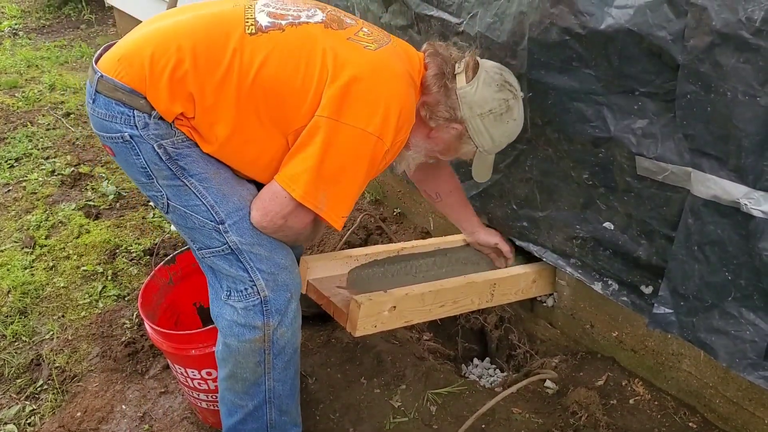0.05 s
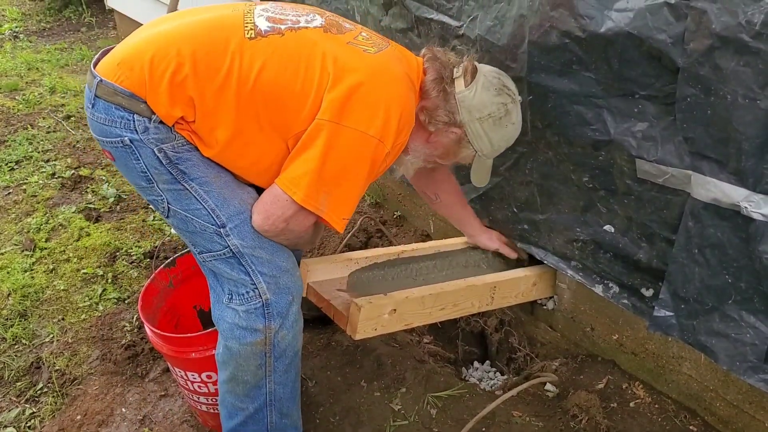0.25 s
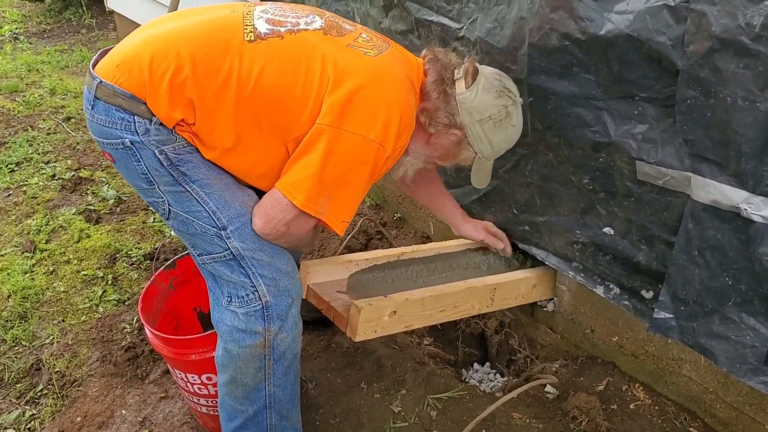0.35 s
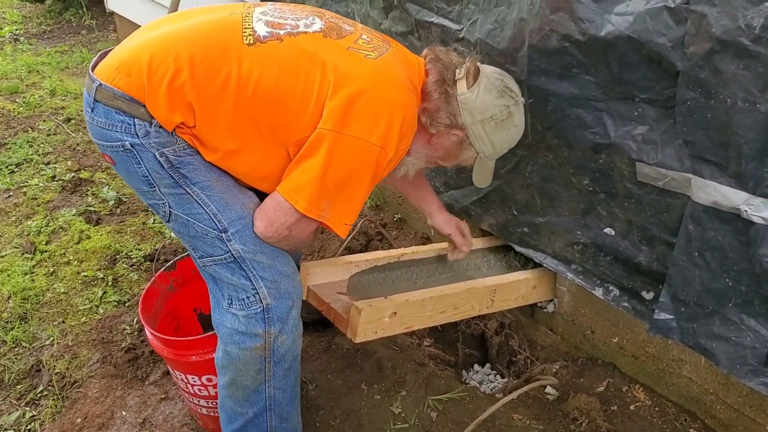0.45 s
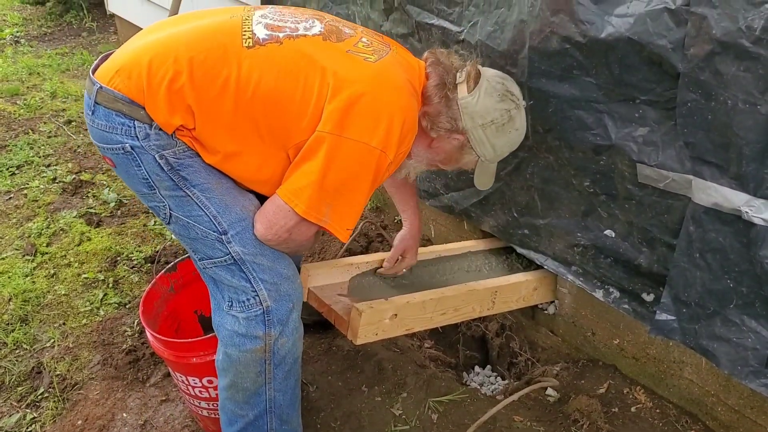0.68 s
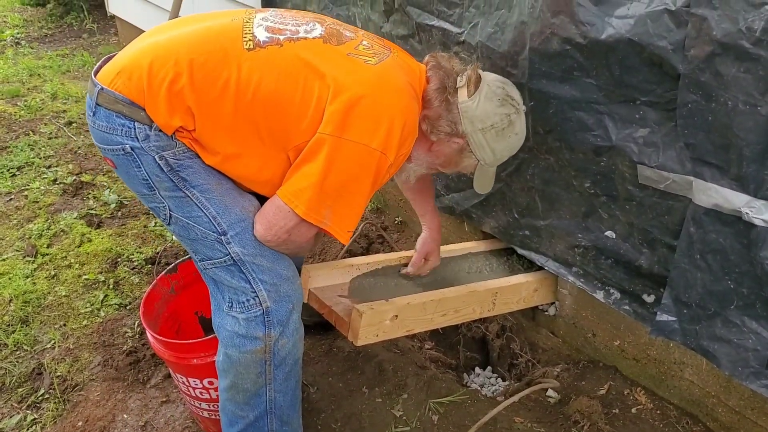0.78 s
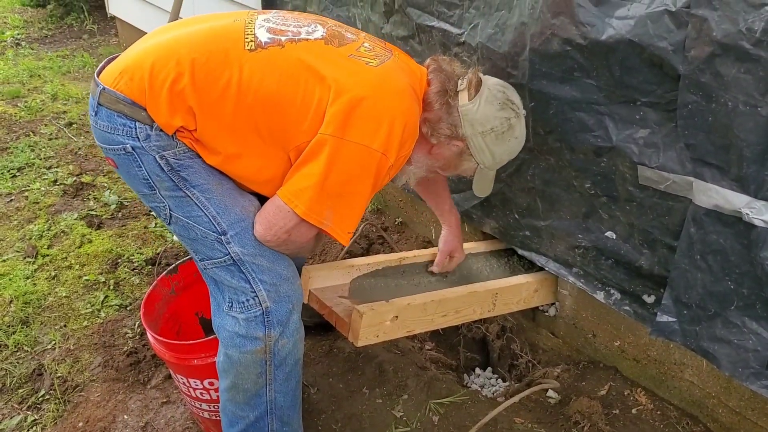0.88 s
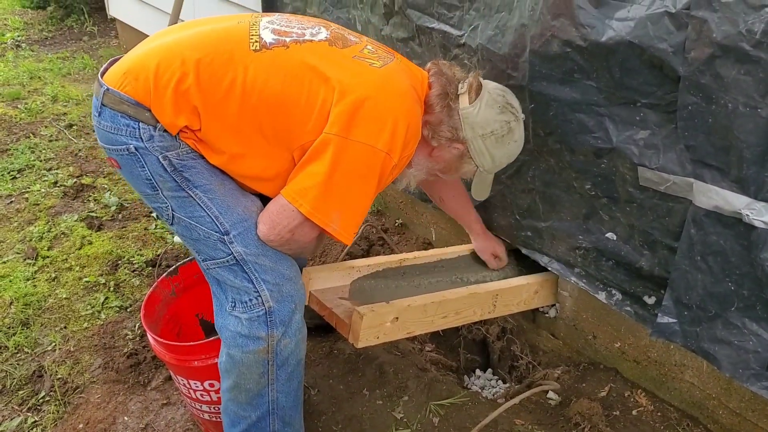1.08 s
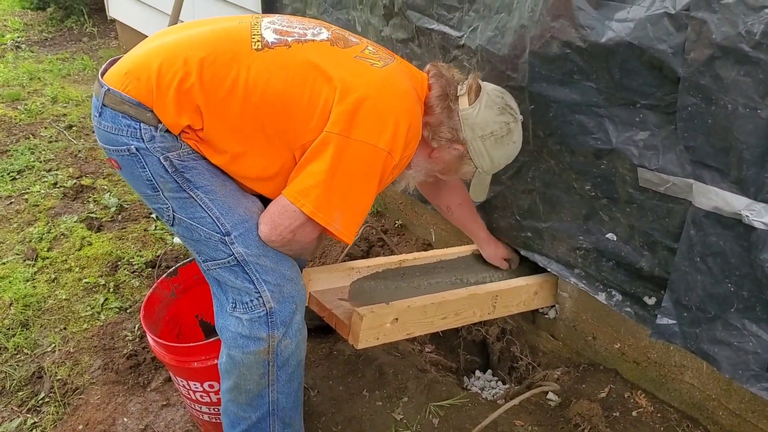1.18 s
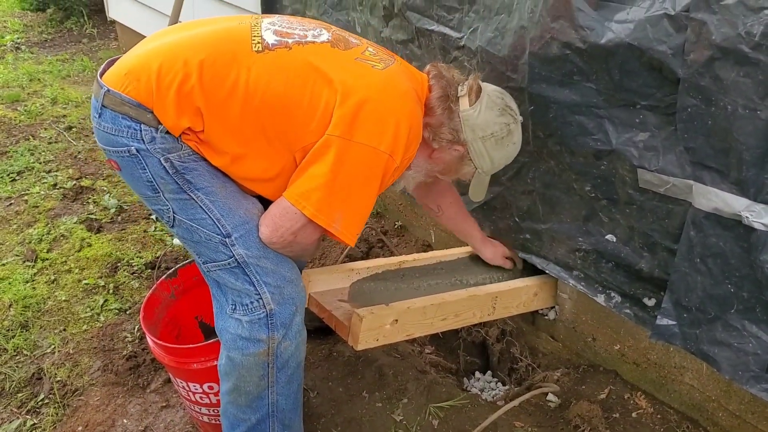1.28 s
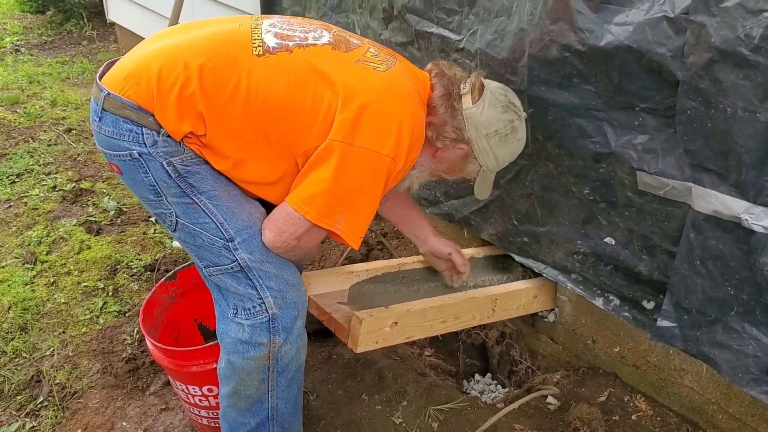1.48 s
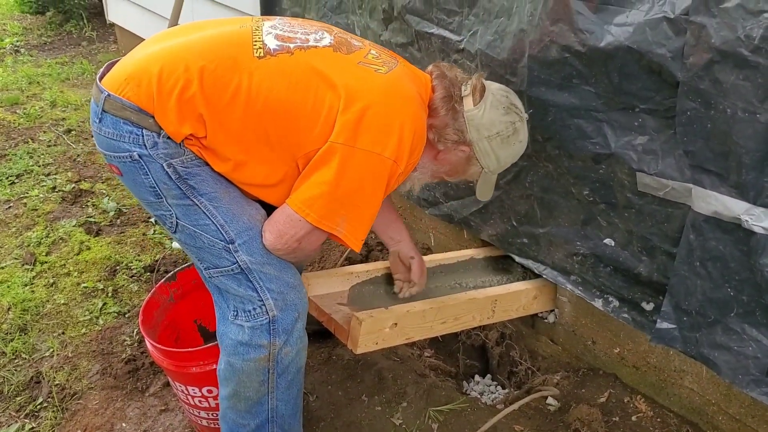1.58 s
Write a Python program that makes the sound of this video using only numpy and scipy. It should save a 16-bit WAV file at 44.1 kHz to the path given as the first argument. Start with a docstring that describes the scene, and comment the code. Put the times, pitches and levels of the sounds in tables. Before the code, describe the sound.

Outdoors, wet sandy mortar scrapes under a hand: two short strokes, then a longer one. A gust thumps the microphone near the start, and a knock on the wooden frame follows the rubbing, with faint distant bird chirps.

```python
"""A hand rubs gritty wet mortar in a wooden frame outdoors: three strokes of sand catching and slipping,
with coarse grains snapping and the wood ringing under the forward strokes. Early on, a gust buffets
the microphone, left port first; near the end a knock sets the frame ringing.
Behind it all sit a low outdoor rumble, a swelling hum and the faint broken chirps of a distant bird."""
import sys
import numpy as np
from scipy import signal
from scipy.fft import rfft, irfft
from scipy.io import wavfile

SR = 44100
rng = np.random.default_rng(int(sys.argv[2]) if len(sys.argv) > 2 else 0)


def store_wav(level_fs):
    """Save 16-bit WAV to argv[1]."""
    pcm = np.round(np.clip(np.atleast_2d(level_fs), -1, 1) * 32767)
    wavfile.write(sys.argv[1], SR, pcm.T.astype(np.int16))


N = 72765
T = np.arange(N) / SR
BIN_HZ = np.fft.rfftfreq(N, 1 / SR)


def amp(db):
    """Decibels to gain."""
    return 10 ** (np.asarray(db) / 20)


def pan(left_db):
    """Gains that lift the left port and lower the right by as much."""
    return amp([[left_db], [-left_db]])


def unit_rms(x):
    """Scales to rms 1."""
    return x / np.sqrt(np.mean(x ** 2, axis=-1, keepdims=True) + 1e-20)


def level(points):
    """An envelope in dB: silent outside its points, but held where it nears an end of the scene."""
    times, db = np.transpose(points)
    before = db[0] if times[0] < .04 else -120
    after = db[-1] if times[-1] > 1.6 else -120
    return np.interp(T, times, db, left=before, right=after)


def drift(rate_hz):
    """Slow random wander, rms 1."""
    return unit_rms(irfft(rfft(rng.standard_normal(N)) * np.exp(-(BIN_HZ / rate_hz) ** 2), N))


def decay(start, t60, rise_s=0.00028):
    """Quick attack and exponential decay."""
    t = np.maximum(T - start, 0)
    return (1 - np.exp(-t / rise_s)) * np.exp(-np.log(1000) * t / t60)


def coloured(x, colour):
    """Equalises x, at rms 1, with a steep low cut under the first point."""
    hz = BIN_HZ + 1
    points_hz, db = np.transpose(colour)
    gain = amp(np.interp(np.log(hz), np.log(points_hz), db))
    low_cut = np.minimum(hz / points_hz[0], 1) ** 2
    return unit_rms(irfft(rfft(x) * gain * low_cut, N))


def ports(x):
    """Spreads x over the two microphone ports: alike in the bass, wide in the treble."""
    # what both ports hear in common (frequency [Hz], power share [0-1])
    likeness = [(100, 0.73), (350, 0.86), (700, 0.8), (1300, 0.61), (2400, 0.46), (4000, 0.089)]
    share = np.interp(BIN_HZ, *np.transpose(likeness))
    scrambled = x * rng.choice([-1, 1], (2, N))
    return irfft(np.sqrt(share) * rfft(x) + np.sqrt(1 - share) * rfft(scrambled), N)


def hiss(colour):
    """Coloured stereo noise."""
    return coloured(ports(rng.standard_normal(N)), colour)


def bursts(hits, colour, t60, rise_s=0.00028):
    """A dying burst of noise at each hit."""
    return sum(amp(db) * decay(start, t60, rise_s) for start, db in hits) * hiss(colour)


def outdoor_air():
    """A bed of low rumble and thin hiss that starts louder and settles."""
    # tone of the bed (frequency [Hz], gain [dB])
    colour = [(20, -24), (55, 8), (110, -2.5), (290, -13), (450, -15.5), (1000, -20.5), (3000, -21.5),
              (7000, -26.5), (12000, -26.5), (15500, -33.5)]
    # its fader ride (time [s], gain [dB])
    fade = [(0, 12), (.6, 0.5), (1.65, 0.5)]
    return amp(-57.5 + level(fade)) * hiss(colour)


def hum(pitch_hz=280.3, width_hz=47.4):
    """A narrow band of noise, heard as a low hum."""
    # two swells (time [s], level [dB])
    swells = [(0, -59), (.13, -50), (.48, -59), (.78, -58), (1.13, -52.5), (1.3, -55), (1.5, -61)]
    phase = 2 * np.pi * pitch_hz * T
    band = (drift(width_hz) * np.cos(phase) + drift(width_hz) * np.sin(phase)) / np.sqrt(2)
    return amp(level(swells)) * band


def bird(pitch_hz=2510, half_length_s=0.016, rasp_rad=0.92):
    """A distant bird: short, hoarse notes that slide up or down."""
    # notes (centre time [s], level [dB], glide [Hz/s])
    chirps = [(1.277, -64, 9000), (1.301, -62.5, -7000), (1.348, -59, -2000), (1.452, -58.5, -9000),
              (1.498, -60, 1510), (1.569, -57, 8000), (1.604, -55.5, -11000), (1.647, -55.5, 5997)]
    song = 0
    for centre, db, glide in chirps:
        t = T - centre
        phase = 2 * np.pi * (pitch_hz * t + glide * t ** 2 / 2) + rasp_rad * drift(rate_hz=190)
        song += amp(db) * np.exp(-(t / half_length_s) ** 2) * np.sin(phase)
    return song


def buffet(pressure, hard_from_db=-25, hard_range_db=9, steady_s=0.012):
    """Turbulence rumbles at one port; the harder it blows, the brighter it gets."""
    # tone of light and of hard wind (frequency [Hz], gain [dB])
    soft_wind = [(20, -29), (50, 0.5), (90, 1), (170, -17), (600, -49), (1500, -75)]
    hard_wind = [(20, -31), (60, 12), (200, 3), (340, -1.5), (440, -8), (700, -22.5), (1000, -37.5),
                 (2500, -78)]
    db, eddies = level(pressure), rng.standard_normal(N)
    hardness = np.clip((db - hard_from_db) / hard_range_db, 0, 1)
    flow = (1 - hardness) * coloured(eddies, soft_wind) + hardness * coloured(eddies, hard_wind)
    # flatten the noise's own swells so that the pressure shapes the level
    window = np.hanning(int(2 * steady_s * SR))
    power = signal.fftconvolve(abs(signal.hilbert(flow)) ** 2 / 2, window / window.sum(), "same")
    return amp(db) * flow / np.sqrt(power + 1e-9)


def thump(start, length, db, top_hz, fall_octaves=2):
    """One eddy hits the port: it swells quickly, then drops in pitch and dies."""
    progress = np.clip((T - start) / length, 0, 1)
    hz = top_hz * 2 ** (-fall_octaves * progress ** 2)
    phase = 2 * np.pi * np.cumsum(hz * (progress > 0)) / SR
    return amp(db) * np.sin(np.pi * np.sqrt(progress)) * np.sin(phase)


def gust(hoot_at_s=.549, hoot_half_s=0.018, hoot_hz=287):
    """Wind hits the left port, then the right; a soft rush and a short hoot follow."""
    # wind pressure at each port, and the rush in its wake (time [s], level [dB])
    wind_left = [(0, -39.5), (.015, -24.5), (.055, -65), (.19, -38.5), (.217, -16), (.26, -14.5),
                 (.3, -21.5), (.326, -37), (.35, -21.5), (.382, -27.5), (.398, -24), (.44, -37),
                 (.465, -22), (.51, -48), (.59, -54), (.636, -39), (.67, -90)]
    wind_right = [(0, -59), (.28, -51), (.35, -39), (.41, -34), (.445, -27), (.478, -23), (.51, -51.5),
                  (.56, -59)]
    wake = [(.44, -51), (.52, -49), (.59, -62.5), (.635, -56.5), (.68, -61.5)]
    # tone of the rush (frequency [Hz], gain [dB])
    wake_colour = [(220, -3), (320, -4.5), (460, -1), (620, -19), (1200, -43.5)]
    # single eddies (start [s], length [s], level [dB], starting pitch [Hz])
    thumps = [(.2162, 0.039, -10.5, 291.8), (0.2477, 0.022, -7.5, 300), (0.2828, 0.017, -13, 248),
              (0.354, 0.024, -12.5, 240), (0.384, 0.037, -21, 117), (0.459, 0.031, -13.5, 109)]
    left = buffet(wind_left) + sum(thump(*row) for row in thumps)
    right = buffet(wind_right)
    rush = amp(level(wake)) * hiss(wake_colour)
    hoot = np.exp(-((T - hoot_at_s) / hoot_half_s) ** 4) * np.sin(2 * np.pi * hoot_hz * T)
    return np.array([left, right]) + rush + amp(-40.5) * hoot


def knock(port_lag_s=.00008):
    """A blow with small rebounds: the frame's modes, a crack, crushed grit and a short yard echo."""
    # blows on the frame, and grit crushed under them (time [s], relative level [dB])
    blows = [(1.3694, -1), (1.3737, -2.5), (1.3872, -23), (1.4127, -21), (1.4374, -22.5)]
    grit = [(1.3703, -30.5), (1.417, -42)]
    # modes of the wood (frequency [Hz], gain [dB], t60 [s])
    modes = [(324, -11, 0.23), (385.3, -9.5, 0.19), (472, -9.5, 0.2), (640, 2, 0.1), (804.7, 6.5, 0.032),
             (890, 3.5, 0.052), (978, -7, 0.11), (1434, -2, 0.044), (1590, 3.5, 0.043), (1770, 7, 0.017),
             (2143, -20, 0.047), (2425, -8, 0.14), (3540, -13, 0.15)]
    # tone of each noise layer (frequency [Hz], gain [dB])
    crack_colour = [(200, -47), (600, 0.5), (900, 3.5), (1200, -3.5), (1700, 3.5), (2500, -3),
                    (3000, -15.5), (4800, -12), (7000, -29.5), (9000, -20), (15500, -13)]
    grit_colour = [(1400, -1), (2400, 12), (3800, -21), (15000, -21)]
    yard_colour = [(150, -42), (380, 6.5), (900, -3), (5000, -20), (15000, -22)]
    port_time = T - np.array([[0], [port_lag_s]])
    ring = 0
    for hz, mode_db, t60 in modes:
        swing = np.sqrt(sum((amp(db) * decay(start, t60)) ** 2 for start, db in blows))
        ring += amp(mode_db) * swing * np.sin(2 * np.pi * (hz * port_time + rng.random()))
    crack = bursts(blows, crack_colour, t60=0.077)
    tail = decay(blows[0][0], t60=0.24, rise_s=0.012) * hiss(yard_colour)
    crush = bursts(grit, grit_colour, t60=0.017)
    return (amp(-34) * ring + amp(-31.5) * crack + crush) * pan(1.4) + amp(-36) * tail


def scuffs():
    """Fingers scuff the frame just before the knock."""
    # touches (time [s], level [dB])
    touches = [(1.322, -48.5), (1.355, -48)]
    # their tone (frequency [Hz], gain [dB])
    colour = [(700, -4), (1300, -10), (1700, 9.5), (2200, -17), (3200, -24), (15000, -33)]
    return bursts(touches, colour, t60=0.1) * pan(1.2)


def snaps():
    """Single coarse grains snap under the hand."""
    # snapping grains (time [s], level [dB])
    cracks = [(0.0712, -38.5), (0.188, -33.5), (0.8251, -37.5), (0.8845, -33), (0.901, -36.5), (1.007, -43),
              (1.022, -35), (1.048, -42), (1.0864, -37), (1.136, -41), (1.16, -48), (1.186, -41.5),
              (1.4164, -38)]
    # their bright tone (frequency [Hz], gain [dB])
    colour = [(800, 10.5), (2300, 2.4), (4500, 7.6), (7200, 2), (11500, 20.8), (15500, 12.7)]
    return bursts(cracks, colour, t60=0.03, rise_s=0.00087) * pan(1.2)


def frame_ring(scrape, half_width_hz=15):
    """Adds the wood's ring to a scrape, wavering as the hand's grip shifts."""
    # narrow resonances of the frame (frequency [Hz], gain [dB])
    modes = [(1665, -1), (2220, -19), (3920, 4.5)]
    response = sum(amp(db) / (1 + 1j * (BIN_HZ - hz) / half_width_hz) for hz, db in modes)
    waver_db = drift(rate_hz=17)
    return scrape + irfft(rfft(scrape) * response, N) * amp(waver_db)


def clumped(scrape, band_hz=1600, flicker_db=1.8):
    """Grains come in clumps: each band of the scrape flickers on its own."""
    spectrum, bands = rfft(scrape), 0
    for centre in np.arange(0, SR / 2, band_hz):
        band = irfft(spectrum * np.maximum(1 - abs(BIN_HZ - centre) / band_hz, 0), N)
        bands += band * amp(flicker_db * drift(rate_hz=130))
    return unit_rms(bands)


def rub(pressure, colour, left_db, rough_db, grains_per_s=3500, grain_share=0.27):
    """Thousands of sand grains catch and slip, over a smooth hiss."""
    grains = unit_rms(rng.choice([-1, 1], N) * (rng.random(N) < grains_per_s / SR))
    friction = np.sqrt(grain_share) * grains + np.sqrt(1 - grain_share) * rng.standard_normal(N)
    scrape = clumped(coloured(ports(friction), colour))
    return scrape * amp(level(pressure) + rough_db * drift(rate_hz=43)) * pan(left_db)


def first_stroke():
    """A short forward push that rings the frame."""
    # hand pressure (time [s], level [dB])
    pressure = [(0, -46.5), (.06, -50.5), (.125, -49), (.2, -53), (.25, -62.5), (.3, -89)]
    # tone of the scrape (frequency [Hz], gain [dB])
    colour = [(290, -39), (500, -10), (657, -27), (769, -7), (1270, -11.5), (1620, -1), (1880, -7.5),
              (3960, -8.5), (7130, -19.5), (12100, -9), (15500, -13.5)]
    return frame_ring(rub(pressure, colour, left_db=1.9, rough_db=1.0))


def back_stroke():
    """The hand draws back, its treble split between left and right."""
    # hand pressure (time [s], level [dB])
    pressure = [(.2, -67), (.25, -49.5), (.295, -42.5), (.385, -44.5), (.436, -51), (.49, -58), (.56, -84)]
    # tone of the scrape (frequency [Hz], gain [dB])
    colour = [(700, -10.5), (1300, -8), (2000, 1), (3250, -5.5), (3670, 6), (4250, -5), (4830, 3),
              (5500, -6), (6100, -5.5), (7200, -24.5), (8500, -13.5), (10000, -37), (12000, -12),
              (15500, -19)]
    # stereo lean (frequency [Hz], left minus right [dB])
    balance = [(3700, -0.7), (4400, -4), (8500, -14.5), (11500, 9), (15000, -13)]
    scrape = rub(pressure, colour, left_db=0.5, rough_db=0.76)
    lean_db = np.interp(BIN_HZ, *np.transpose(balance)) / 2
    return irfft(rfft(scrape) * amp([lean_db, -lean_db]), N)


def sand_fizz():
    """Fine sand fizzes late in the back stroke and as the long one starts."""
    # swells (time [s], level [dB])
    swells = [(.28, -62), (.34, -50.5), (.39, -46), (.43, -78), (.765, -65), (.785, -53.5), (.84, -74),
              (.9, -67)]
    # their airy tone (frequency [Hz], gain [dB])
    colour = [(5000, -26), (8500, -7), (12000, 6), (15500, -5.5)]
    return rub(swells, colour, left_db=0.5, rough_db=0.5)


def long_stroke():
    """A long forward push: a ringing scrape, a hollow midrange rub and a low drag."""
    # envelope of each layer (time [s], level [dB])
    pressure = [(.68, -80), (.76, -65), (.81, -49.5), (.89, -42.5), (1, -42.5), (1.085, -44.5),
                (1.106, -50), (1.15, -45), (1.2, -56.5), (1.27, -62.5), (1.45, -61)]
    hollow_swell = [(.9, -60.5), (1.02, -56), (1.07, -48), (1.17, -51.5), (1.28, -64.5)]
    drag_swell = [(.76, -74), (.86, -54), (1.2, -57.5), (1.36, -57.5), (1.5, -63)]
    # tone of each layer (frequency [Hz], gain [dB])
    scrape_colour = [(290, -24), (500, -7), (530, -17.5), (657, -11.5), (1030, -15.5), (1220, -30),
                     (1330, -18), (1650, 0.5), (1990, -9.5), (2290, -2.5), (3190, -11.5), (3900, -8),
                     (4500, -13.5), (6360, -12.5), (7240, -23.5), (11300, -11.5), (15500, -17.5)]
    hollow_colour = [(400, -44), (670, 3), (950, -8.5), (1200, 5.5), (1500, -6.5), (2500, -13)]
    drag_colour = [(35, -5), (60, -1), (200, 0.5), (450, -7), (900, -44)]
    scrape = frame_ring(rub(pressure, scrape_colour, left_db=0.56, rough_db=0.34))
    hollow = rub(hollow_swell, hollow_colour, left_db=0, rough_db=3.0)
    drag = amp(level(drag_swell)) * hiss(drag_colour)
    return scrape + hollow + drag


def scene():
    """The stereo mix at the microphone."""
    mortar = first_stroke() + back_stroke() + sand_fizz() + long_stroke() + snaps()
    return mortar + scuffs() + knock() + gust() + bird() + hum() + outdoor_air()


def record(dry):
    """A steep high cut takes off the very top."""
    high_cut = signal.firwin(511, cutoff=15800, window=("kaiser", 9), fs=SR)
    return signal.oaconvolve(dry, high_cut[None], "same")


dry = scene()
out = record(dry)
store_wav(out)
```